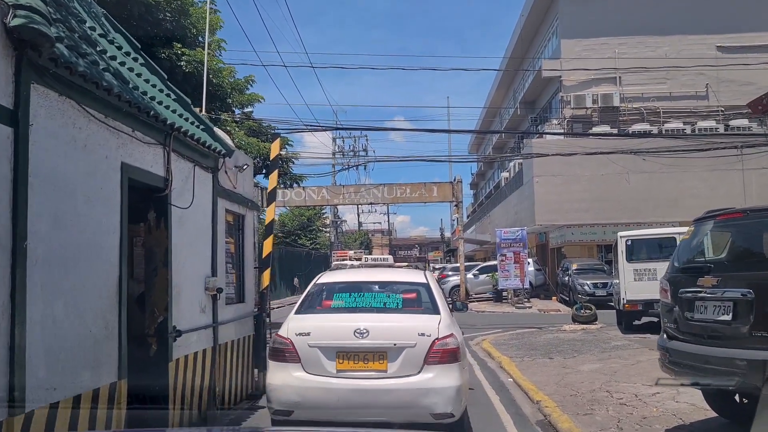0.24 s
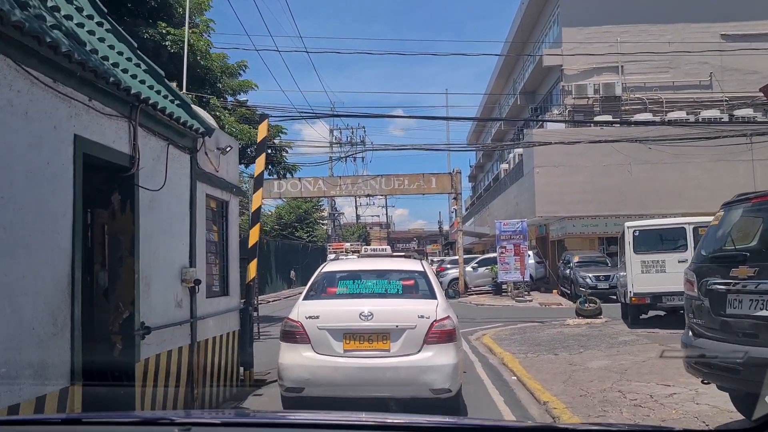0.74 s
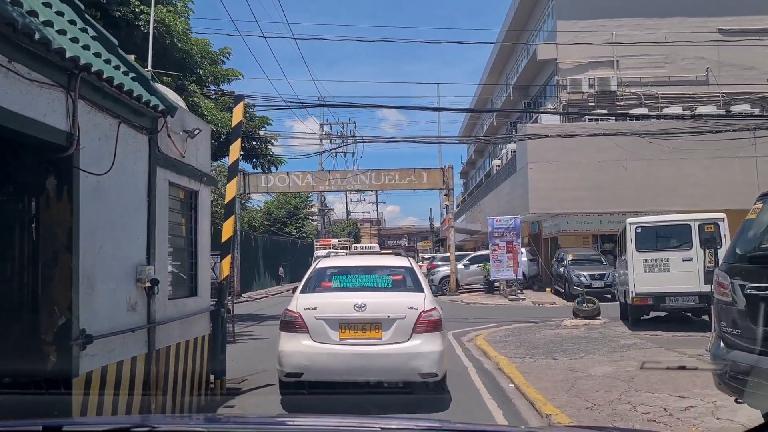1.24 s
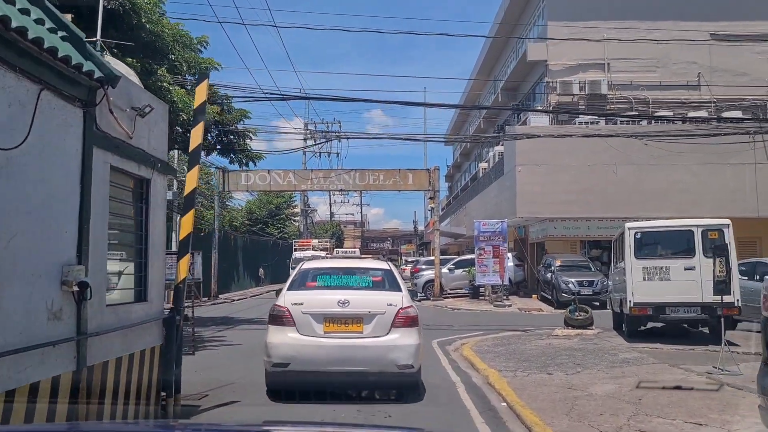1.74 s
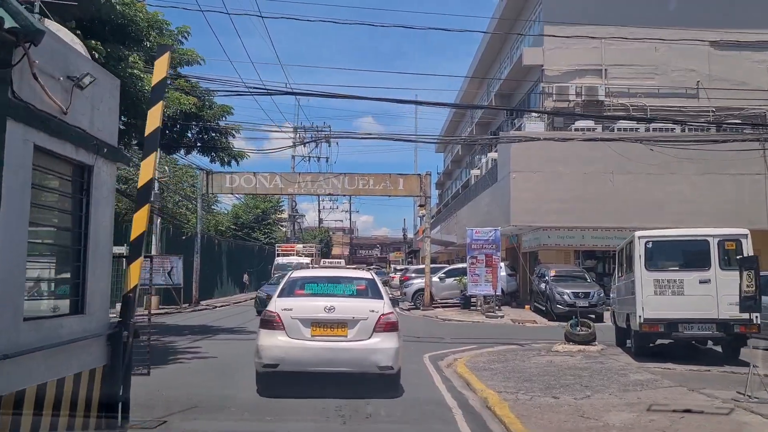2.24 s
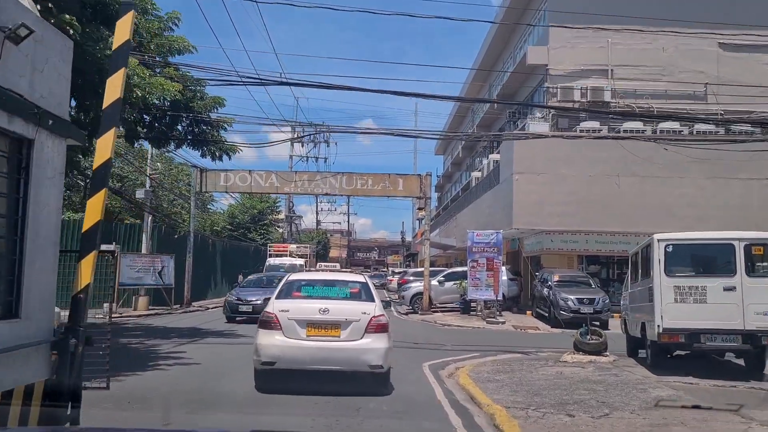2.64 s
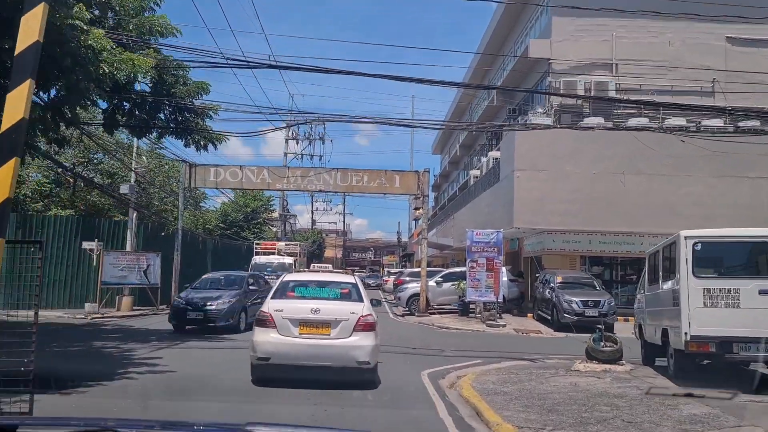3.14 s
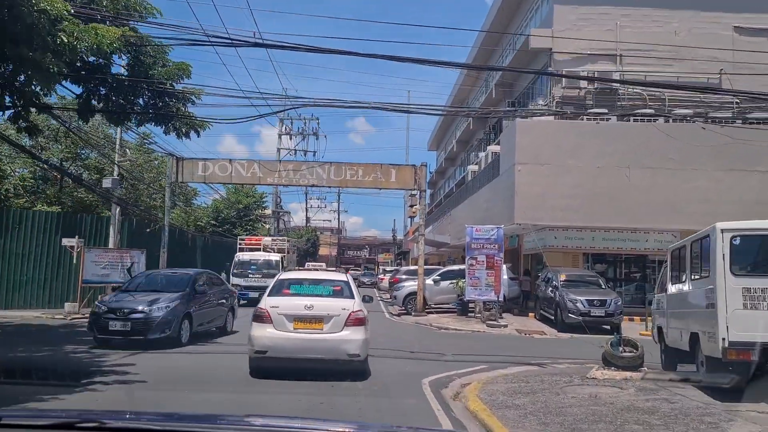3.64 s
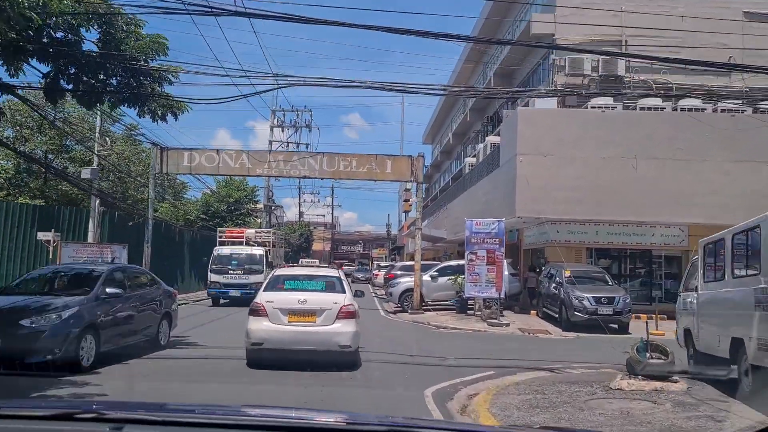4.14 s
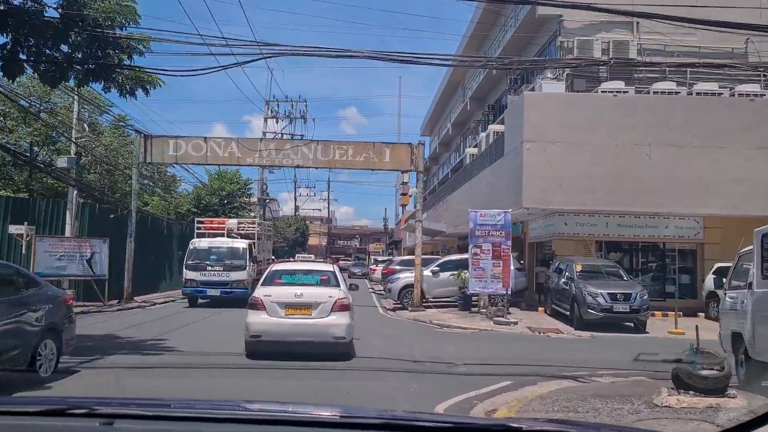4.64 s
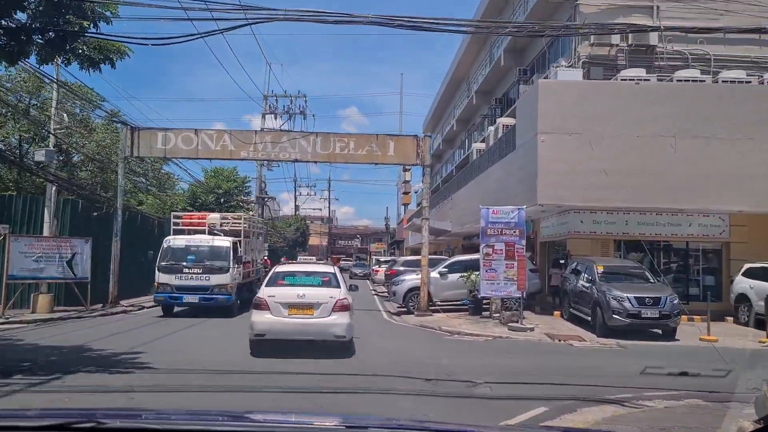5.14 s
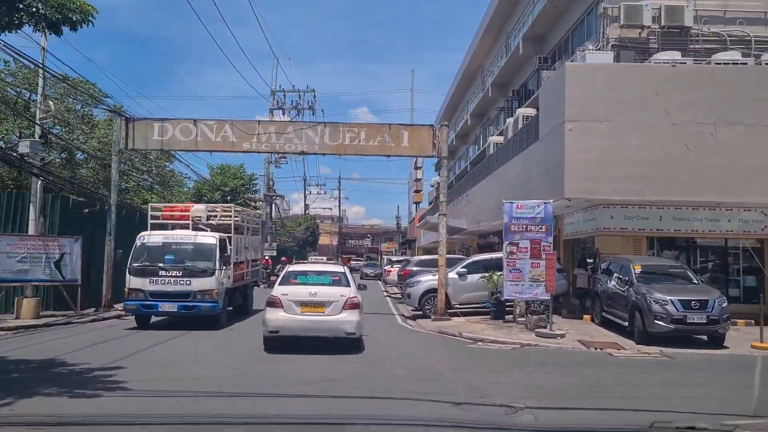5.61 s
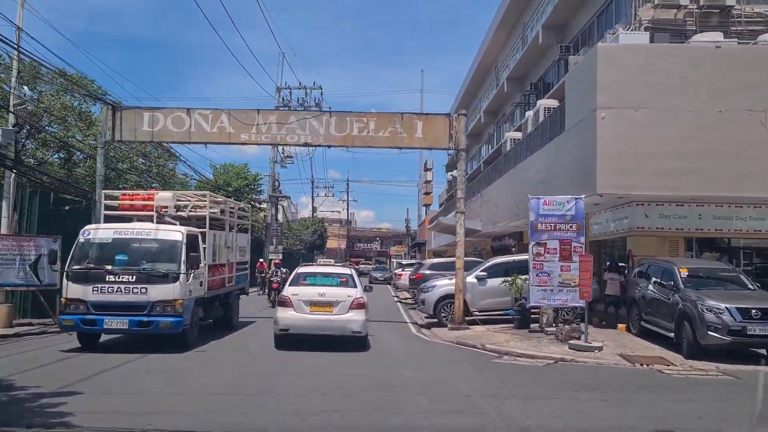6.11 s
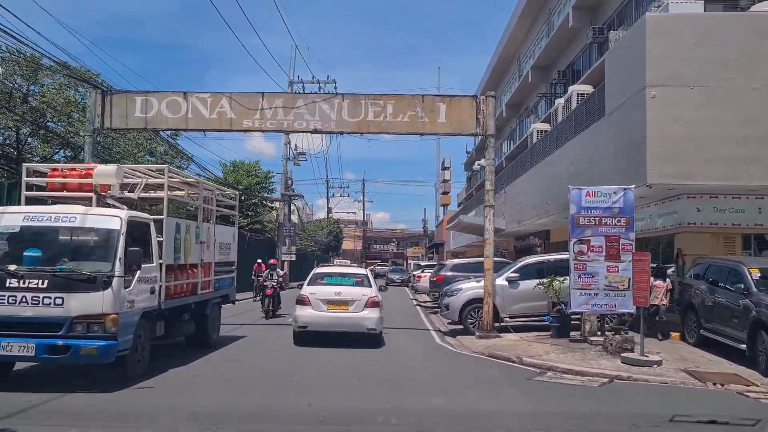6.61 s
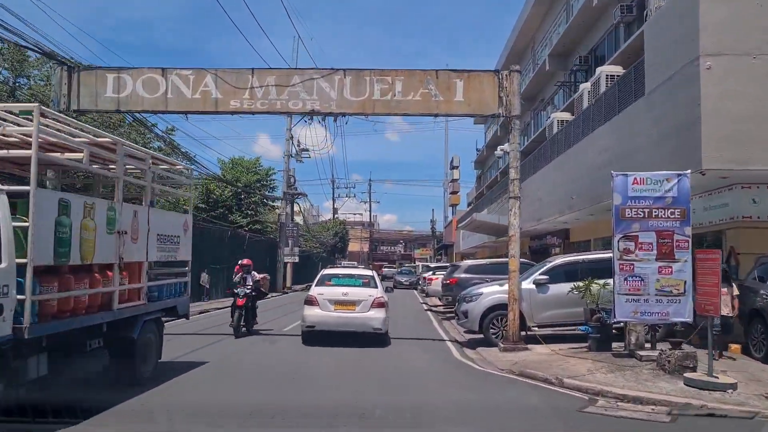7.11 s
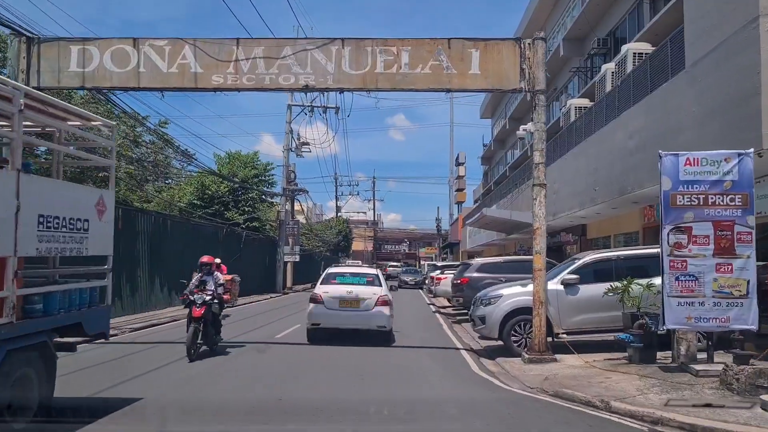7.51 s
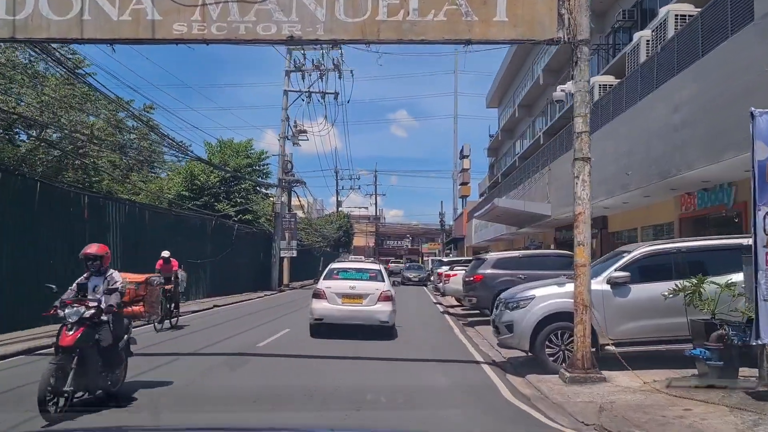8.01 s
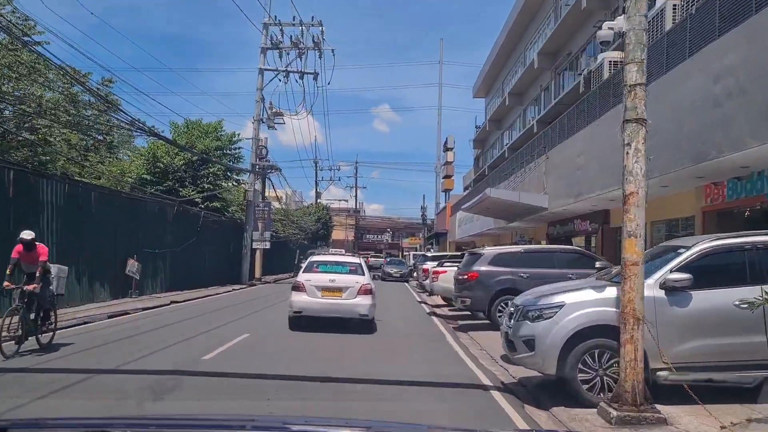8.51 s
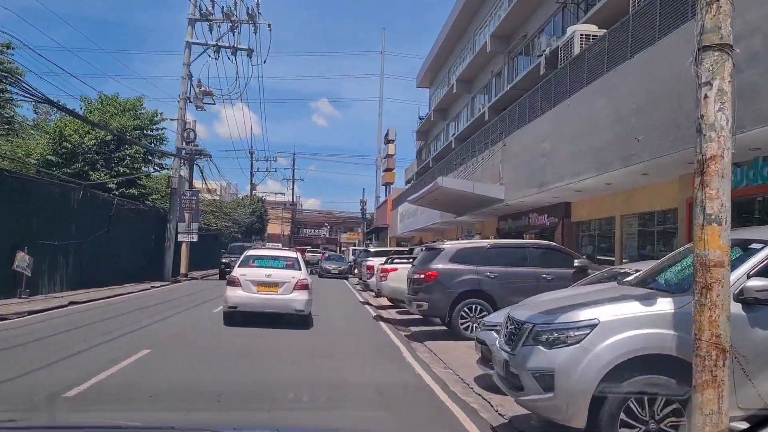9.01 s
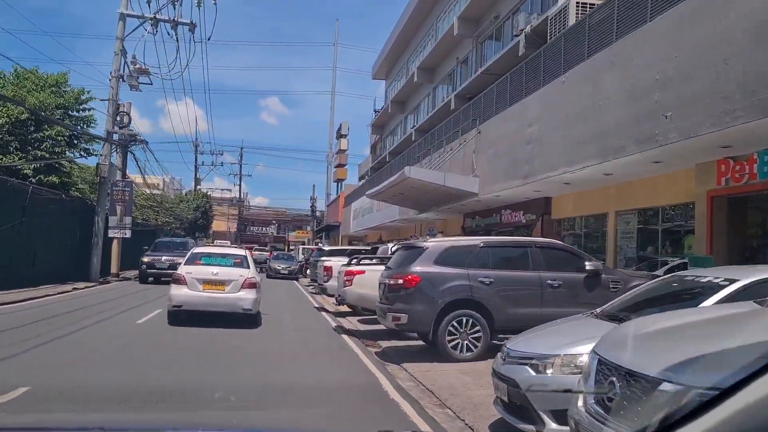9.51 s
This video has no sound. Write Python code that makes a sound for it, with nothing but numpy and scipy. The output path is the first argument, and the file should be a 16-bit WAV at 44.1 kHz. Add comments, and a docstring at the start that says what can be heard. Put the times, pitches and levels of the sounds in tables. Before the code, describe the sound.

Muffled car cabin drone with airy fan noise and rumbling tyres, one heavy low jolt, rising engine pitch, gear change and light trim ticks.

```python
"""First an idling engine drones in a car cabin under steady vent rush, a fan hum, thin whirrs and pump whine.
The car creeps through a gate, takes one hard bump and softer ones, then pulls away and changes up.
Engine, fan, pump and passing vehicles are sines on pitch curves; tyres, vents and soft hisses are coloured noise.
Trim ticks and one clacking catch are short scrapes that ring modes; bumps are decaying low sines."""
import sys
import numpy as np
from scipy import signal
from scipy.fft import rfft, irfft
from scipy.io import wavfile

SR = 44100
rng = np.random.default_rng(int(sys.argv[2]) if len(sys.argv) > 2 else 0)


def unload_wav(signal):
    """Save mono or channel-first audio to the path in sys.argv[1] as 16-bit WAV at rate SR, clipped to [-1, 1]."""
    wavfile.write(
        sys.argv[1],
        SR,
        np.round(np.clip(np.atleast_2d(signal).T, -1, 1) * 32767).astype(np.int16),
    )


N = 430416
TIME = np.arange(N) / SR
BINS_HZ = np.maximum(np.arange(N // 2 + 1) * SR / N, 1)
HALF_SPLIT = np.array([[.5], [-.5]])   # shares a left-minus-right dB between the sides

# Vent rush colour: (frequency [Hz], relative density [dB per Hz])
VENT_COLOUR = [(60, -28.5), (200, -2.5), (260, 2.5), (315, -17.5), (410, -9), (520, -12.5), (700, -11),
               (900, -15), (1400, -12.5), (1750, -16), (2400, -25), (4000, -38.5), (7500, -44.5),
               (15000, -57)]
# Singing bands of vents and belt drive: (centre [Hz], nominal width [Hz], level [dB])
VENT_BANDS = [(592, 55, -60.5), (712, 50, -65), (1068, 16, -67), (1560, 150, -65), (2460, 130, -77),
              (3020, 190, -81.5), (3254, 110, -77.5), (3497, 20, -84), (3825, 70, -84), (6235, 1200, -77),
              (8050, 440, -95), (9880, 400, -91)]
# Narrow whirrs: (start [s], end [s], centre [Hz], nominal width [Hz], level [dB])
WHIRRS = [(-0.3, 1.65, 1422, 26, -59), (-0.3, 0.45, 1625, 45, -61), (0.7, 2.9, 1615, 45, -64.5),
          (2.2, 3.9, 1550, 60, -62.5), (3.7, 5.2, 1770, 45, -60), (3.8, 9.9, 1798, 24, -63.5),
          (3.8, 9.7, 1432, 36, -64), (5.3, 7.9, 1600, 80, -61), (7.4, 8.9, 1520, 70, -63),
          (7.8, 9.6, 1755, 50, -64), (3.2, 9.9, 1130, 70, -63.5), (8.2, 9.5, 1100, 70, -60),
          (5.3, 8.5, 2020, 80, -67.5), (3.7, 9.4, 2195, 24, -72), (0.4, 2.1, 3320, 14, -79),
          (8.9, 9.9, 3315, 14, -78), (-0.3, 3.4, 5515, 45, -84.5)]
# Fuel pump pitch: (time [s], frequency [Hz])
PUMP_PITCH = [(0, 3252), (0.5, 3252), (1.1, 3262), (2.7, 3262), (4, 3271), (5.2, 3269), (6.75, 3274),
              (7.4, 3261), (8.9, 3254), (9.76, 3255)]
# Fuel pump level before flutter: (time [s], left [dB], right [dB])
PUMP_LEVEL = [(0, -79, -85), (0.5, -76, -84), (0.85, -68.5, -82), (1.1, -73, -81), (1.35, -74, -79),
              (1.8, -82, -88), (2.28, -73, -66.5), (2.6, -85, -75), (3.3, -82, -74), (3.9, -68.5, -68),
              (4.3, -71, -69.5), (4.9, -67.5, -70), (5.4, -75, -71), (6.55, -76, -71.5), (6.9, -71, -66.5),
              (7.3, -76, -70), (7.7, -71.5, -73), (8.2, -74, -69), (8.45, -68, -66.5), (9.3, -64.5, -70.5),
              (9.76, -65.5, -69)]
# Oncoming engines: (start [s], end [s], first pitch [Hz], last pitch [Hz], level [dB])
PASSERS = [(5.652, 6.8, 173, 191, -43.5), (6.997, 8.25, 144.5, 119.1, -41.5), (7.699, 9.6, 84, 56.8, -36)]
# Soft hisses: (peak time [s], Gaussian sigma [s], level [dB])
HISSES = [(1.942, 0.055, -65), (7.56, 0.1, -67.5), (7.82, 0.1, -64.5), (8.137, 0.1, -67.5),
          (8.357, 0.034, -63.5)]
# Hiss colour: (frequency [Hz], relative density [dB per Hz])
HISS_COLOUR = [(500, -34.5), (3000, 5.5), (4600, 0), (7000, -6), (9500, -9), (10700, -10.5), (11350, -8),
               (12200, -14), (16000, -20)]
# Trim ticks: (time [s], level [dB], centre [Hz], Gaussian sigma [octaves], t60 [s], left minus right [dB])
TRIM_TICKS = [(.518, -46, 1000, 0.25, 0.09, 2), (.829, -71, 13500, 0.51, .05, 4),
              (1.206, -49, 3200, 0.15, .04, 3), (1.207, -55, 6000, 0.6, .035, 0),
              (1.664, -62, 6200, .4, .06, -2), (4.022, -52, 2800, 0.25, 0.057, 2),
              (4.034, -52, 2900, 0.27, 0.055, 2), (6.915, -46, 2900, .5, .04, -5),
              (6.918, -56.5, 10000, .6, .045, -4), (6.921, -46, 4500, 1.3, .05, 1),
              (8.124, -46, 2100, 0.62, 0.091, -1), (8.14, -47, 2300, 0.73, 0.055, -1),
              (8.212, -64, 13000, .6, .06, 0), (8.225, -50.5, 4700, 0.38, 0.069, -1),
              (8.343, -51, 3600, 1, 0.058, 0), (8.36, -66, 13600, 0.19, .04, 2),
              (8.375, -47, 3700, 0.7, .065, 1), (9.207, -58, 3500, .4, .078, 2),
              (9.244, -54, 3570, 0.41, 0.076, 4), (9.258, -64, 8500, 0.37, .078, 4),
              (9.302, -66, 7500, .45, 0.074, 0)]
# Trim modes: (centre [Hz], nominal width [Hz], relative level [dB])
TRIM_MODES = [(1360, 270, 8), (2260, 450, 6), (3140, 570, 3), (3780, 500, -7), (4420, 500, -3),
              (4930, 540, -6.5), (6600, 900, -7.5), (8800, 3300, -6.5), (10900, 1500, -12.5),
              (13500, 2000, -13)]
# Touches of a hard plastic catch: (time [s], level [dB], left minus right [dB])
CATCH_TOUCHES = [(6.915, -54, -11), (6.9195, -49, -6), (6.922, -49, -3)]
# Catch modes: (frequency [Hz], relative level [dB], t60 [s])
CATCH_MODES = [(1380, 4, .035), (2450, 2, .022), (3020, 1, .02), (4290, 0, .06), (5600, -13, .03),
               (6680, -7, .022), (6930, -6, .022), (8600, -14, .02), (11300, -12, .025), (12030, -5, .028)]
# Bumps exciting the cabin air: (time [s], level before rise and decay [dB])
BUMPS = [(1.874, -5), (2.14, -16), (2.442, -24), (5.839, -19.5), (6.991, -17)]
# Road speed, expressed as tyre roar: (time [s], level [dB])
ROAD_SPEED = [(0.0, -46.5), (3.2, -47.5), (3.8, -43.5), (4.3, -42), (5.0, -40.5), (6.3, -40.5), (8.0, -41),
              (9.76, -41.5)]
# Tyre rumble colour: (frequency [Hz], relative density [dB per Hz])
RUMBLE_COLOUR = [(12, -37), (19, -19.5), (27, 3.5), (42, 1), (58, 0.5), (80, -2.5), (100, -2.5),
                 (125, -5.5), (160, -9.5), (220, -17), (400, -52.5), (1500, -100)]
# Tyre roar colour: (frequency [Hz], relative density [dB per Hz])
ROAR_COLOUR = [(20, -39.5), (120, -21.5), (200, -2.5), (280, 1), (340, -2.5), (450, -4), (530, -8),
               (680, -11.5), (900, -16.5), (1130, -18.5), (1300, -21), (1750, -19), (2500, -31),
               (4500, -40), (15000, -78.5)]
# Engine speed, idle, up through first gear, down into second: (time [s], firing rate [Hz])
FIRING = [(0, 24.7), (1.5, 24.9), (2.3, 24.2), (3.3, 27.3), (3.7, 30), (4, 35.5), (5, 41.2), (6, 46.8),
          (6.35, 49.4), (6.55, 46.5), (6.85, 38.5), (7.1, 36.9), (7.7, 37.6), (8.4, 39.5), (9.76, 39.6)]
# Engine load; creeps, coasts, pulls away, eases, pulls in second gear:
# (time [s], boom at firing rate, relative [dB], drone at twice firing rate, relative [dB])
LOAD = [(0, -2.5, 1.5), (1.6, -2.5, -0.5), (2.3, -11.5, -13.5), (3.2, -12, -2.5), (3.45, -7, 4.5),
        (3.78, 10, 2.5), (4.05, 1, 6.5), (4.65, 4, 1), (5.0, -13, -1), (5.25, -2, 3), (6.3, 0, 0),
        (6.7, -5.5, 2.5), (7.0, 4, 1.5), (7.5, 6.5, 3.5), (7.8, 3, 3), (8.25, 6.5, 1.5), (8.65, -1.5, 2.5),
        (9.1, -1, -1.5), (9.76, -4, -1)]
# Growl at three times the firing rate, before flutter: (time [s], level [dB])
GROWL = [(0, -39.5), (1.5, -40), (2.0, -52), (3.1, -49.5), (3.55, -34), (3.9, -45.5), (4.5, -47.5),
         (5.0, -39), (5.8, -44), (6.2, -51.5), (6.7, -42), (7.5, -37.5), (8.1, -44), (9.76, -43)]
# Higher engine orders: (multiple of firing rate [1], level relative to drone [dB])
HIGH_ORDERS = [(4, -17), (6, -24)]
# Car resonances for engine orders: (centre [Hz], width [Hz], gain added to unity [dB])
BOOMS = [(33.74, 6.96, 13), (85.9, 4, 0.5), (147.5, 9.2, -3.5)]
# Left-right likeness of the noise: (frequency [Hz], correlation [-1..1])
LIKENESS = [(40, 1), (140, 1), (260, 0.76), (460, 0.72), (800, 0.24), (1100, -0.04), (2000, 0),
            (15000, 0.02)]
# Stereo tilt of the sum: (frequency [Hz], left minus right [dB])
TILT = [(35, -0.5), (80, -4), (150, -2.5), (500, -0.5), (1100, -1.2), (1900, -3), (4000, 0), (8000, 1.8),
        (12000, -3.5)]


def from_db(db):
    """Decibels to gain."""
    return 10 ** (np.asarray(db) / 20)


def rms_one(x):
    """Scale to unit rms."""
    return x / np.sqrt(np.mean(x ** 2) + 1e-20)


def in_time(rows):
    """Interpolate each column of a time table to every sample."""
    time_s, *columns = np.transpose(rows)
    return [np.interp(TIME, time_s, column) for column in columns]


def over_hz(points):
    """Interpolate a table linearly over log frequency."""
    hz, value = np.transpose(points)
    return np.interp(np.log(BINS_HZ), np.log(hz), value)


def drift(rate_hz):
    """Low-passed Gaussian noise with rms 1."""
    hz = BINS_HZ[:N // 80]
    spectrum = rfft(rng.standard_normal(2 * len(hz) - 2))
    slow = irfft(spectrum / (1 + (hz / rate_hz) ** 4))
    return np.interp(TIME, np.linspace(0, N / SR, len(slow)), rms_one(slow))


def resonance(hz, width_hz):
    """Bell-shaped spectral gain, rms 1 over all bins."""
    return rms_one(1 / (1 + ((BINS_HZ - hz) / (0.36 * width_hz)) ** 2))


def cabin_noise(gain):
    """Stereo noise of a given colour, rms 1; long waves reach both sides alike."""
    mid, side = rfft(rng.standard_normal((2, N)))
    alike = np.clip(over_hz(LIKENESS), -1, 1)
    shared = np.sqrt(1 + alike) * mid
    opposed = np.sqrt(1 - alike) * side * [[1], [-1]]
    return rms_one(irfft(gain * (shared + opposed), N))


def tone(hz):
    """Sine of rms 1 along a pitch curve, random start phase."""
    return np.sqrt(2) * np.sin(2 * np.pi * (np.cumsum(hz) / SR + rng.random()))


def swell_between(start_s, end_s, fade_s):
    """Linear rise after the start and fall before the end."""
    return np.clip(np.minimum(TIME - start_s, end_s - TIME) / fade_s, 0, 1)


def ventilation(rush_db=-47.5, fan_hz=85.9, fan_db=-39, fan_fade_start_s=4.2, fan_fade_db_per_s=6.5):
    """Turbulent vent rush, wavering resonant bands, and a fan tone that dies away."""
    out = from_db(rush_db) * cabin_noise(from_db(over_hz(VENT_COLOUR)))
    for hz, width_hz, db in VENT_BANDS:
        swell = from_db(1.2 * drift(1.5))
        out += from_db(db) * swell * cabin_noise(resonance(hz, width_hz))
    fade_db = fan_fade_db_per_s * np.maximum(TIME - fan_fade_start_s, 0)
    fan_gain = from_db(fan_db - fade_db + 3.0 * drift(29.0))
    return out + fan_gain * tone(fan_hz * (1 + 0.0047 * drift(2.2)))


def whirrs(fade_s=0.19, wander=.25):
    """Narrow bands: a wandering carrier modulated by separate slow noise on each side."""
    out = np.zeros((2, N))
    for start_s, end_s, hz, width_hz, db in WHIRRS:
        pitch_hz = hz + wander * width_hz * drift(4)   # wander is a share of the width
        phase = 2 * np.pi * np.cumsum(pitch_hz) / SR
        cos, sin = np.cos(phase), np.sin(phase)
        sides = [drift(width_hz / 2) * cos + drift(width_hz / 2) * sin for side in range(2)]
        out += from_db(db) * swell_between(start_s, end_s, fade_s) * np.array(sides)
    return out


def pump():
    """Fuel pump: a thin sine whine whose strength wavers separately on each side."""
    hz = in_time(PUMP_PITCH)[0] + .8 * drift(8)
    flutter_db = np.array([1.7 * drift(6) + 1.2 * drift(25) - .5 for side in range(2)])
    return from_db(np.array(in_time(PUMP_LEVEL)) + flutter_db) * tone(hz)


def passers(fade_s=0.27, flutter_db=3.5):
    """Oncoming engines: each hum swells, glides in pitch as it nears and passes, and fades."""
    out = np.zeros(N)
    for start_s, end_s, first_hz, last_hz, db in PASSERS:
        hz = np.interp(TIME, [start_s, end_s], [first_hz, last_hz])
        gain = from_db(db + flutter_db * drift(1.7))
        out += swell_between(start_s, end_s, fade_s) * gain * tone(hz)
    return out


def hisses():
    """Soft hisses: fine-grained bright noise under Gaussian swells."""
    swell = np.zeros(N)
    for peak_s, sigma_s, db in HISSES:
        swell += from_db(db) * np.exp(-.5 * ((TIME - peak_s) / sigma_s) ** 2)
    grain = from_db(1.2 * drift(120))
    return swell * grain * cabin_noise(from_db(over_hz(HISS_COLOUR)))


def trim(rise_s=0.0017, grain_s=0.0018, grain_db=4):
    """Plastic parts slip: each gritty scrape excites the trim modes around the part's own pitch."""
    grid_hz = np.geomspace(500, SR / 2, 600)
    all_modes = sum(from_db(db) * resonance(hz, width_hz) for hz, width_hz, db in TRIM_MODES)
    modes = np.interp(grid_hz, BINS_HZ, all_modes)
    age_s = np.arange(SR // 4) / SR
    size = len(age_s)
    bins_hz = np.fft.rfftfreq(size, 1 / SR)

    def slip(centre_hz, octaves, t60_s):
        """One dying noise burst through the modes near a pitch."""
        near = np.exp(-.5 * (np.log2(grid_hz / centre_hz) / octaves) ** 2)
        colour = np.interp(bins_hz, grid_hz, modes * near, left=0)
        grit = np.interp(age_s / grain_s, np.arange(size), rng.standard_normal(size))
        noise = from_db(grain_db * grit) * rng.standard_normal((2, size))
        scrape = rms_one(irfft(colour * rfft(noise), size))
        decay = from_db(-60 * np.maximum(age_s - rise_s, 0) / t60_s)
        return scrape * np.minimum(age_s / rise_s, 1) * decay

    out = np.zeros((2, N))
    for time_s, db, centre_hz, octaves, t60_s, pan_db in TRIM_TICKS:
        at = int(time_s * SR)
        out[:, at:at + size] += from_db(db + pan_db * HALF_SPLIT) * slip(centre_hz, octaves, t60_s)
    return out


def catch(scrape_s=0.0024):
    """Three touches of a plastic catch: brief scrapes, different on each side, ring its modes."""
    age_s = np.arange(SR // 8) / SR
    rings = np.zeros(len(age_s))
    for k, (hz, db, t60_s) in enumerate(CATCH_MODES):
        sign = (-1) ** k
        rings += sign * from_db(db - 60 * age_s / t60_s) * np.sin(2 * np.pi * hz * age_s)
    force = np.zeros((2, N))
    for time_s, db, pan_db in CATCH_TOUCHES:
        at = int(time_s * SR)
        scrape = rng.standard_normal((2, len(age_s))) * np.exp(-age_s / scrape_s)
        scrape /= np.linalg.norm(scrape[0])   # unit energy on the left
        force[:, at:at + len(age_s)] += from_db(db + pan_db * HALF_SPLIT) * scrape
    return signal.fftconvolve(force, rings[None], axes=1)[:, :N]


def bumps(boom_hz=39.7, rise_s=.035, t60_s=0.66):
    """Each jolt swells into a low cabin boom and dies away."""
    out = np.zeros(N)
    for time_s, db in BUMPS:
        age_s = np.maximum(TIME - time_s, 0)
        envelope = from_db(db - 60 * age_s / t60_s) * np.minimum(age_s / rise_s, 1)
        out += envelope * np.sin(2 * np.pi * boom_hz * age_s)
    return out


def tyres(rumble_db=-31.0, rumble_growth=0.39, roar_db=-41.5, roar_growth=1.21, cruise_db=-41.0):
    """Rumble comes through the suspension; tread roar climbs faster with speed (growth in dB per dB)."""
    speed_db = in_time(ROAD_SPEED)[0] - cruise_db
    rumble_gain = from_db(rumble_db + rumble_growth * speed_db)
    roar_gain = from_db(roar_db + roar_growth * speed_db)
    rumble = rumble_gain * cabin_noise(from_db(over_hz(RUMBLE_COLOUR)))
    roar = roar_gain * cabin_noise(from_db(over_hz(ROAR_COLOUR)))
    return (rumble + roar) * from_db(0.72 * drift(9.7))


def cabin_boom(hz):
    """Gain of the car's low resonances at a given pitch."""
    lifts = [from_db(db) / (1 + (2 * (hz - centre_hz) / width_hz) ** 2) for centre_hz, width_hz, db in BOOMS]
    return 1 + sum(lifts)


def engine(boom_base_db=-35, drone_base_db=-36.0, rough_db=2.0, boom_rough_db=1.5, drone_rough_db=1.43):
    """Four-cylinder firing harmonics follow load and cabin resonance; uneven combustion flutters each."""
    firing_hz = in_time(FIRING)[0] * (1 + .002 * drift(8))
    boom_load_db, drone_load_db = in_time(LOAD)
    boom_db = boom_base_db + boom_load_db
    drone_db = drone_base_db + drone_load_db

    boom_gain = from_db(boom_db + boom_rough_db * drift(12.0))
    out = boom_gain * cabin_boom(firing_hz) * tone(firing_hz)
    drone_gain = from_db(drone_db + drone_rough_db * drift(5.7))
    out += drone_gain * cabin_boom(2 * firing_hz) * tone(2 * firing_hz)
    # the growl bypasses the cabin resonances
    out += from_db(in_time(GROWL)[0] + rough_db * drift(7)) * tone(3 * firing_hz)
    for multiple, db in HIGH_ORDERS:
        hz = round(multiple) * firing_hz
        out += from_db(drone_db + db + rough_db * drift(6.2)) * cabin_boom(hz) * tone(hz)
    return out


def scene(fade_s=.002):
    """Sum all sources, soften both ends and tilt the stereo balance over frequency."""
    cabin = ventilation() + whirrs() + pump() + passers() + hisses()
    cabin = cabin + trim() + catch() + bumps() + tyres() + engine()
    from_edge_s = np.minimum(TIME, TIME[::-1])
    fade = np.sin(np.pi / 2 * np.minimum(from_edge_s / fade_s, 1)) ** 2
    return irfft(rfft(fade * cabin) * from_db(over_hz(TILT) * HALF_SPLIT), N)


def record(dry, cutoff_hz=15700):
    """Steep elliptic low-pass."""
    low_pass = signal.ellip(10, .1, 80, cutoff_hz, fs=SR, output="sos")
    return signal.sosfilt(low_pass, dry)


dry = scene()
out = record(dry)
unload_wav(out)
```